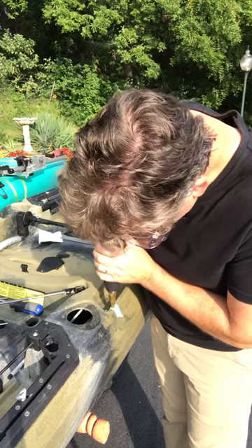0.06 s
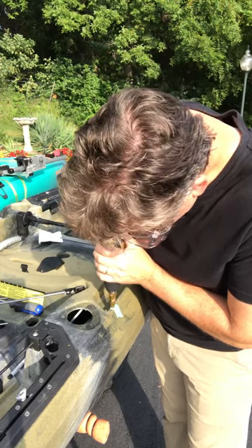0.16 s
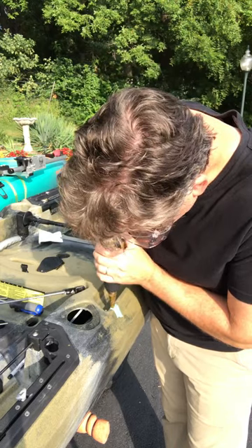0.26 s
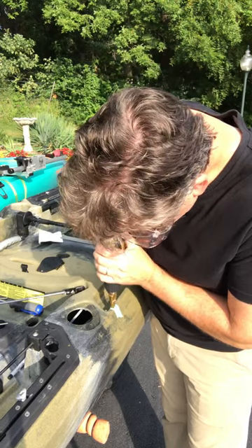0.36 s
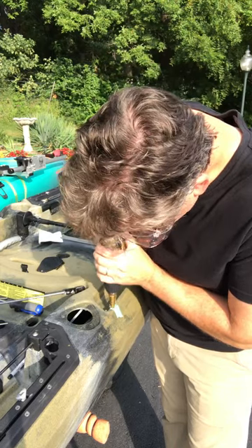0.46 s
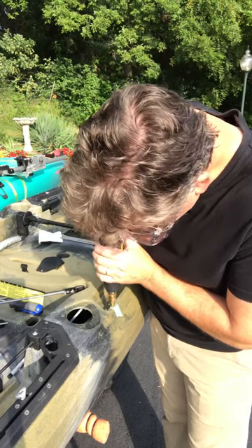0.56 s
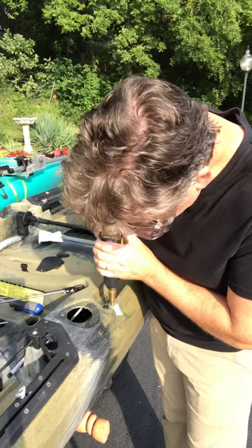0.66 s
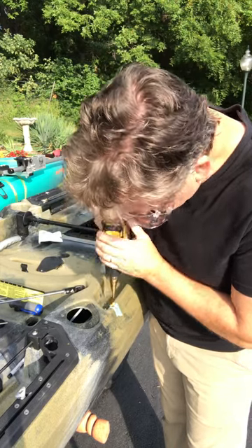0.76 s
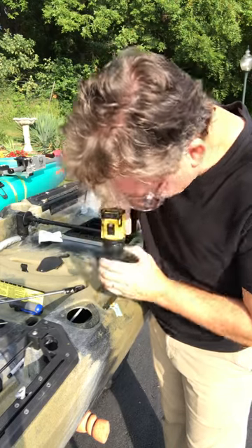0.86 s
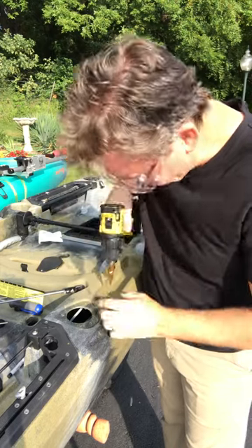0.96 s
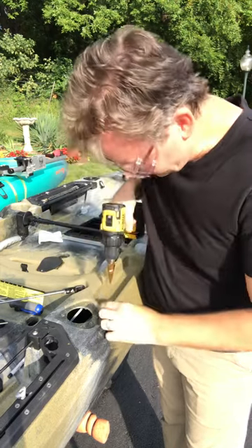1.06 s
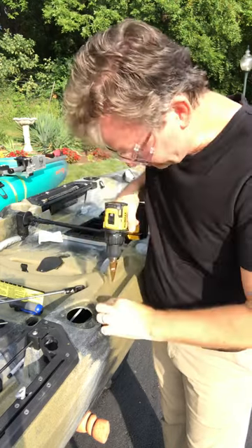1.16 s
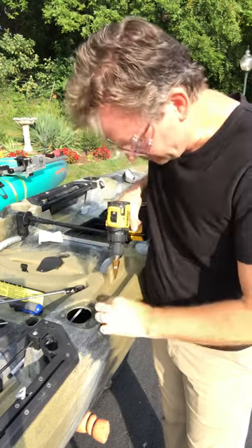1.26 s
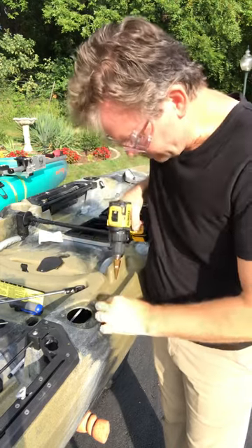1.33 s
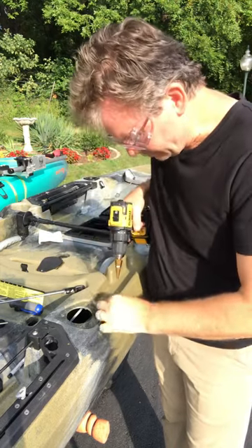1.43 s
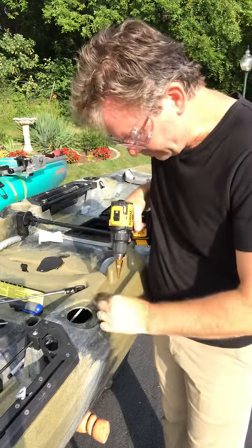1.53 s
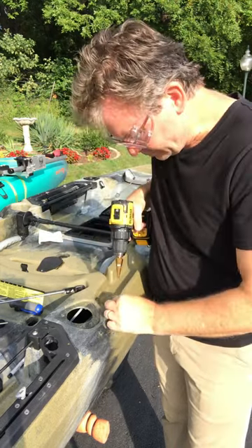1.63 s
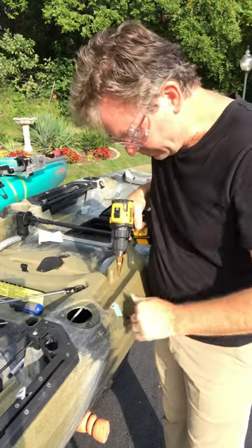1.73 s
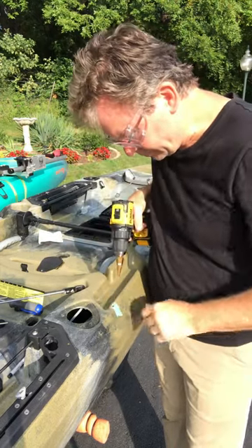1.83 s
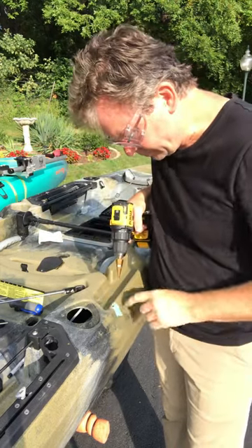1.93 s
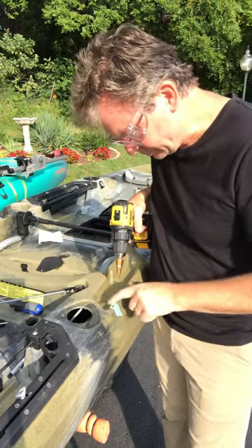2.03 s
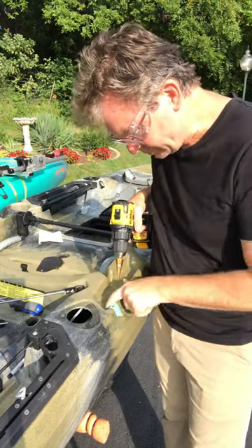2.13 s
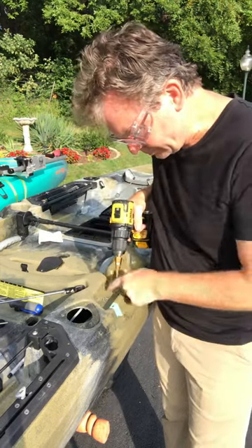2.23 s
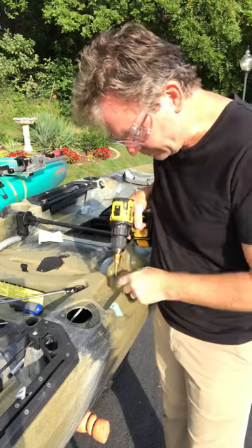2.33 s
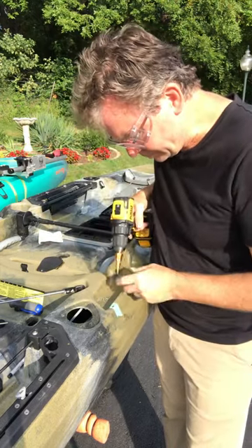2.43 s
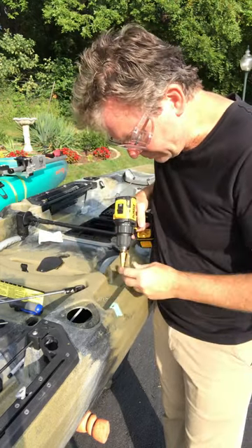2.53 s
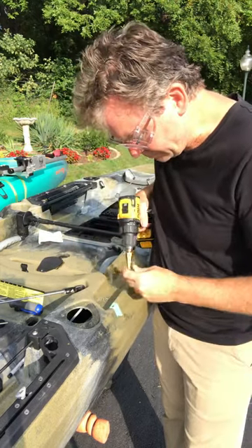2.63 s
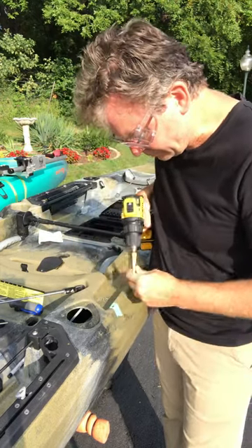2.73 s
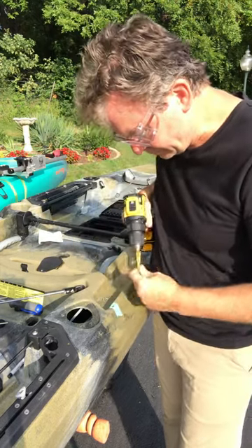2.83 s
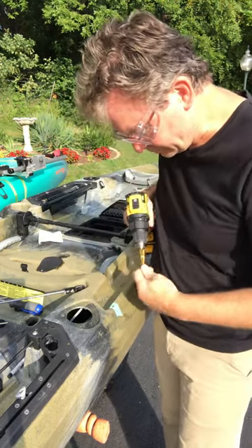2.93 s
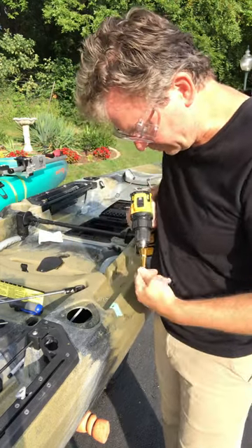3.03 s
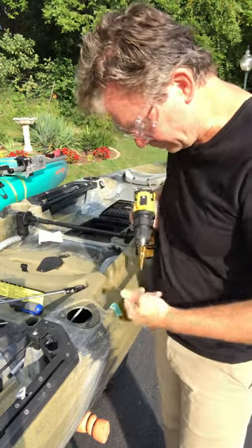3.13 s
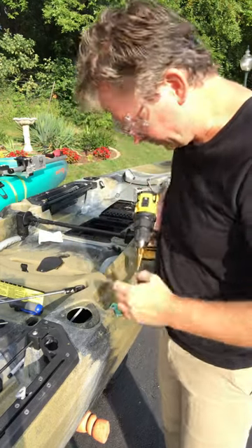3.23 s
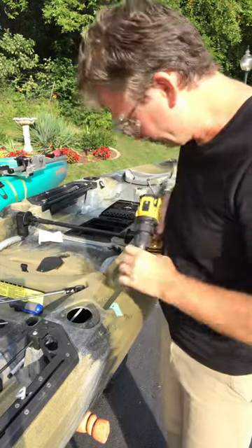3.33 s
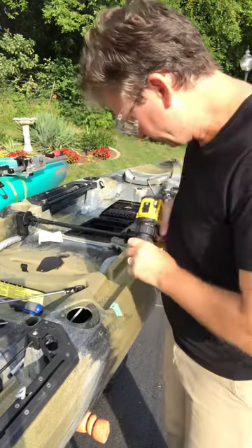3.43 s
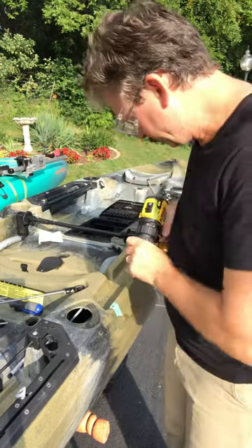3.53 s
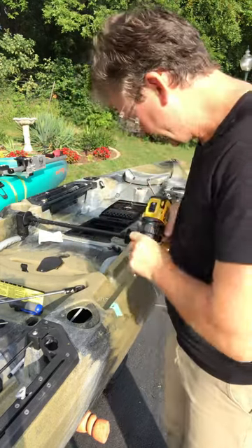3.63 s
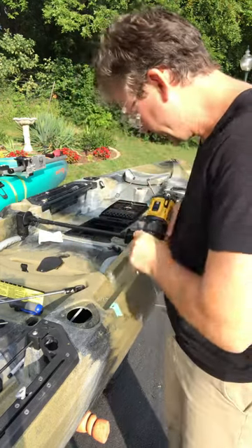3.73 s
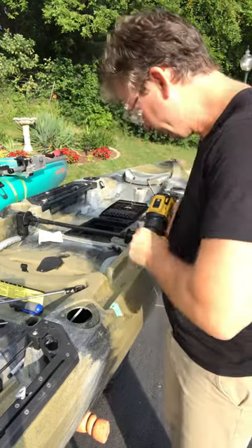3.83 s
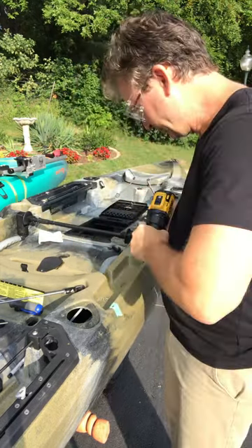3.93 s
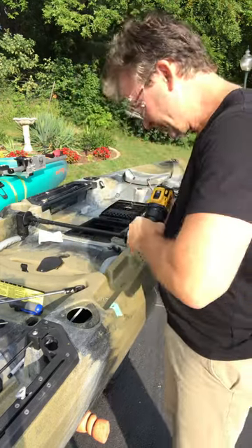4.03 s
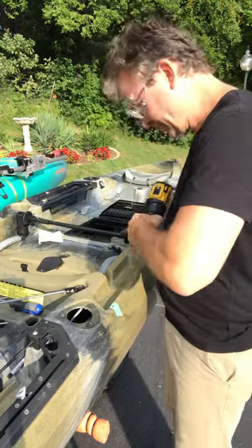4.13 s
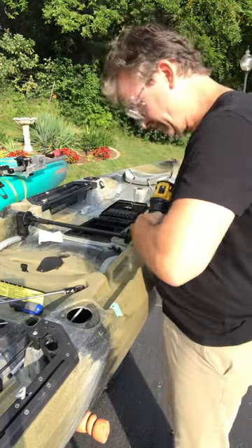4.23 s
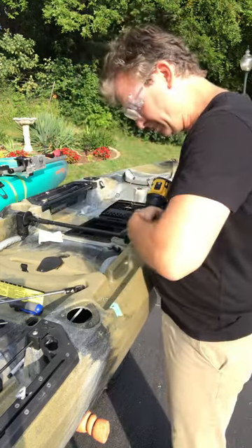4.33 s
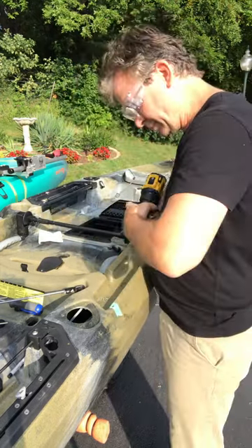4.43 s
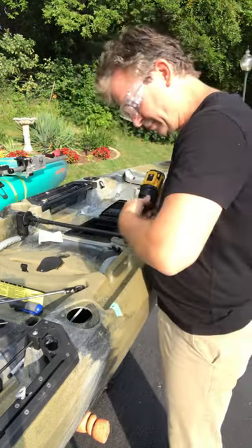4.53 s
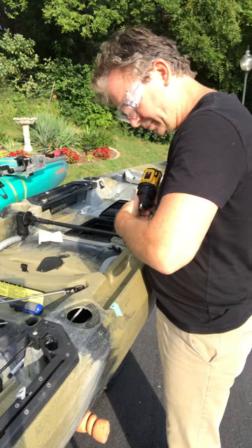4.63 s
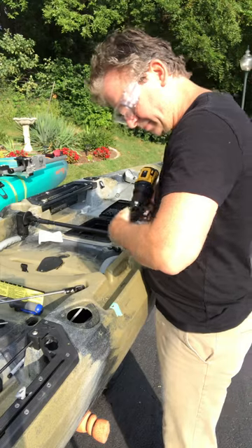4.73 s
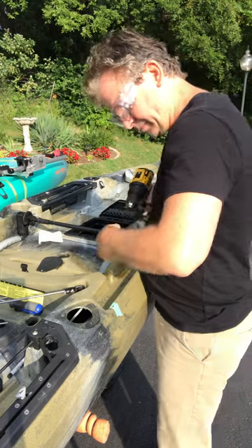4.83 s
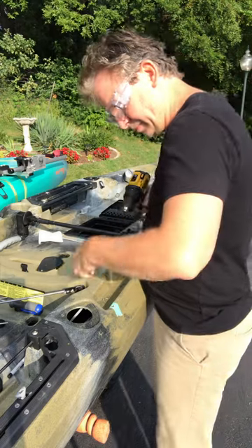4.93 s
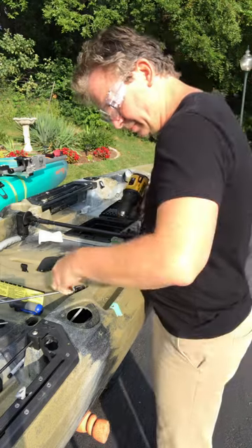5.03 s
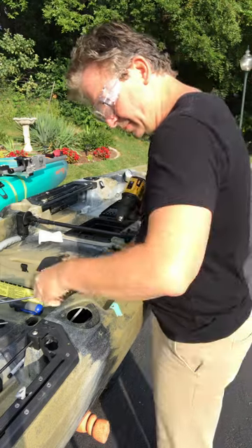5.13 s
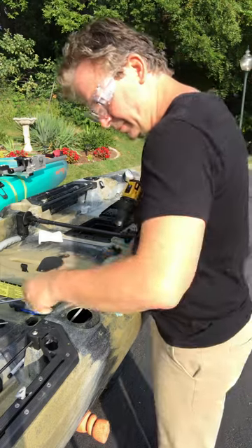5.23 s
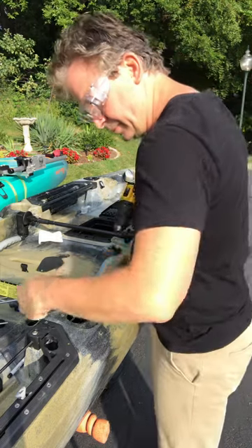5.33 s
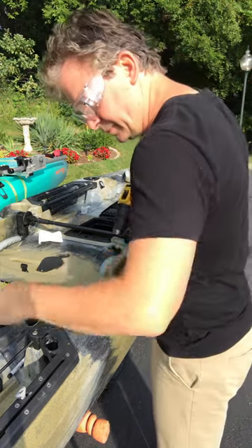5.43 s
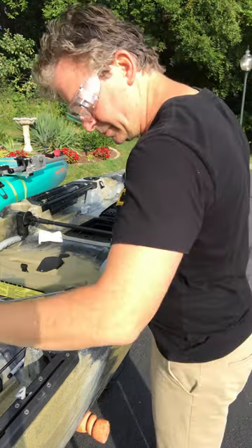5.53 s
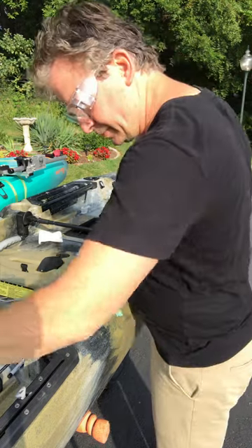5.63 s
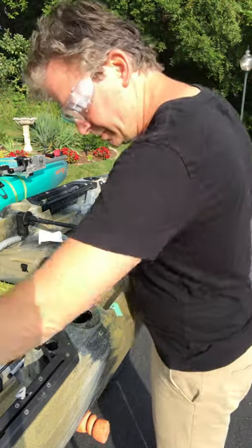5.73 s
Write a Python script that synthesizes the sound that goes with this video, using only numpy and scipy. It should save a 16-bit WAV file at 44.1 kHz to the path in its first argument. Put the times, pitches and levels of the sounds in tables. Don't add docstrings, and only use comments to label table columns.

```python
import sys
import numpy as np
from scipy import signal
from scipy.fft import rfft, irfft
from scipy.io import wavfile
from scipy.ndimage import uniform_filter1d, map_coordinates

SR = 44100
rng = np.random.default_rng(int(sys.argv[2]) if len(sys.argv) > 2 else 0)


def undo_db(level):
    steps = np.asarray(level, float) / 20
    return 10 ** steps


def transcribe(signal):
    frames = np.atleast_2d(signal).T
    limited = np.clip(frames, -1, 1)
    pcm = np.round(limited * 32767).astype(np.int16)
    wavfile.write(sys.argv[1], SR, pcm)


N = 254885


def unit(x):
    return x / np.sqrt(np.mean(x ** 2) + 1e-20)


def along(points, hz):
    f, v = np.transpose(points)
    return np.interp(np.log(hz + 1), np.log(f + 1), v)


def curves(rows):
    s, *cols = np.transpose(rows)
    return [np.interp(np.arange(N) / SR, s, c) for c in cols]


def gate(start, stop, attack, release):
    t = np.arange(N) / SR
    return np.clip(np.minimum((t - start) / attack, 1 + (stop - t) / release), 0, 1)


def bump(peak, width):
    return np.exp(-((np.arange(N) / SR - peak) / width) ** 2)


def wobble(rate):
    coarse = np.arange(0, N + 32, 32)
    knots = rng.standard_normal(int(N * rate / SR) + 4)
    return np.interp(np.arange(N), coarse, map_coordinates(knots, [coarse * rate / SR]))


def hiss(spectrum, patchy_db):
    hz, _, z = signal.stft(rng.standard_normal(N + SR), SR, nperseg=2048)
    field = uniform_filter1d(rng.standard_normal(z.shape), 20, 0)
    field = uniform_filter1d(field, 4, 1)
    gain = undo_db(along(spectrum, hz)[:, None] + patchy_db * unit(field))
    return unit(signal.istft(z * gain, SR, nperseg=2048)[1][:N])


def resonate(x, hz, breadth):
    q = hz / np.clip(breadth * hz, 5, .4 * SR)
    return signal.lfilter(*signal.iirpeak(hz, q, SR), x)


def line(turns, unsteady_db, slip):
    size = np.sqrt(2) * undo_db(unsteady_db * wobble(40.32))
    return size * np.sin(2 * np.pi * turns + slip * wobble(59.74))


def traffic():
    # f/Hz, level/dB per Hz
    road_spectrum = [(15, -38), (25, -31), (65, 2), (142, -8.5), (182, -13), (238, -11.5), (299, -15),
                     (642, -18.5), (1660, -24.5), (3500, -30), (4550, -83), (7700, -120)]
    return undo_db(-61.5 + 0.6 * wobble(3.9)) * hiss(road_spectrum, patchy_db=0.5)


def chorus():
    # f/Hz, level/dB per Hz
    chorus_spectrum = [(2600, -50), (3600, -19), (4340, -6), (4980, -11.5), (5670, -1.5), (6370, -4),
                       (7090, -1.5), (8100, -5), (8600, -13.5), (9500, -23.5), (10450, -28.5),
                       (11900, -19.5), (13500, -24.5), (15600, -33)]
    return undo_db(-58.5) * hiss(chorus_spectrum, patchy_db=1.36)


def far_cicada():
    # f/Hz, level/dB per Hz
    drone_spectrum = [(2500, -34), (3050, 5.5), (3500, 0), (3850, -5.5), (4400, -32)]
    # peak t/s, level/dB, half width/s
    swells = [
        (1.4, 10.5, .3),
        (2.0, 2, 0.27),
        (2.8, 8.5, 0.22),
    ]
    drone_db = -78.5 + sum(db * bump(s, width) for s, db, width in swells)
    return undo_db(drone_db) * hiss(drone_spectrum, patchy_db=1.2)


def katydid():
    # f/Hz, level/dB per Hz
    scrape_spectrum = [(12500, -40), (14300, -9), (15300, 3), (15700, 4), (17000, 0.5)]
    # base level/dB, swell/dB, peak t/s, half width/s
    base_db, swell_db, peak_s, width_s = (-91, 8, 4, 1.2)
    t = np.arange(N) / SR
    strokes_hz, slowing = 17.255, .1252
    strokes = .51 + strokes_hz * t - slowing * t ** 2 / 2
    song_db = base_db + swell_db * bump(peak_s, width_s) + 17.5
    return undo_db(song_db) * (.5 + .5 * np.cos(2 * np.pi * strokes)) ** 1.1 * hiss(scrape_spectrum, patchy_db=2.5)


def near_cicada():
    # f/Hz, level/dB per Hz
    rib_spectrum = [(5000, -49), (6400, -33), (6950, 2), (7300, -14), (8200, -27), (8800, -38)]
    # base level/dB, swell/dB, peak t/s, half width/s
    base_db, swell_db, peak_s, width_s = (-62.5, -10, -1.2, -2)
    t = np.arange(N) / SR
    pulses_hz, drift_pulses, drift_s = 53.775, .8, 3.85
    pulses = .4 + pulses_hz * t + drift_pulses * np.cos(2 * np.pi * (t - 3.5) / drift_s)
    song_db = base_db + swell_db * bump(peak_s, width_s) + 1.1 * wobble(2.3)
    return undo_db(song_db) * (.5 + .5 * np.cos(2 * np.pi * pulses)) ** 0.48 * hiss(rib_spectrum, patchy_db=0.5)


def cricket(bouts, hz, length):
    t = np.arange(N) / SR
    chirps = [(s, db) for first, end, gap, db in bouts for s in np.arange(first, end, gap)]
    shape = undo_db(wobble(3.9)) * sum(undo_db(db) * np.exp(-((t - s) / length) ** 4) for s, db in chirps)
    pulses = 1 + 0.54 * np.cos(2 * np.pi * 123 * t + wobble(8))
    rasp = resonate(resonate(rng.standard_normal(N), hz, breadth=0.028), hz, breadth=0.028)
    return shape * pulses * unit(rasp)


def crickets():
    # first t/s, end t/s, gap/s, level/dB
    low_bouts = [(.796, 1.9, .251, -76), (2.256, 2.9, .27, -77), (3.079, 5.7, .2306, -75.5)]
    high_bouts = [(1.209, 1.8, .252, -83), (2.03, 3.4, .252, -86), (3.505, 4.3, .231, -81),
                  (4.42, 5.7, .247, -83)]
    return cricket(low_bouts, hz=9100, length=0.039) + cricket(high_bouts, hz=10040, length=0.032)


def jay():
    # t/s, length/s, level/dB, fall of pitch/Hz
    notes = [
        (1.225, .17, -62, 26),
        (1.478, .16, -62, 16),
        (1.675, .075, -69, 4),
        (1.8, .07, -74, 4),
    ]
    start_hz, echo_hz, flutter_hz = 792, 776, 13
    opens_db, echo_dull_db = 14, -9
    out, t = np.zeros(N), np.arange(N) / SR
    for k, (s, length, db, sag_hz) in enumerate(notes):
        done, echo = np.clip((t - s) / length, 0, 1), k > 1
        pitch = (echo_hz if echo else start_hz) - sag_hz * done ** 1.5 + 2.5 * wobble(25)
        turns = np.cumsum(pitch) / SR
        second = undo_db(db + opens_db * (np.sqrt(done) - 1) + 0.74 + echo * echo_dull_db)
        fourth = undo_db(db - 2.5) * (1 + .55 * np.cos(2 * np.pi * flutter_hz * (t - s - .015)))
        voice = second * line(2 * turns, unsteady_db=1.8, slip=.25)
        voice += second * undo_db(-19) * line(3 * turns, unsteady_db=2.5, slip=.4)
        voice += fourth * line(4 * turns, unsteady_db=1.8, slip=.5)
        voice += fourth * undo_db(-12) * line(6 * turns, unsteady_db=2.5, slip=.5)
        out += gate(s, s + length, attack=0.012, release=0.016) * voice
    return out


def far_whistles():
    # t/s, length/s, f/Hz, level/dB
    whistles = [(3.505, .06, 3155, -73), (3.585, .04, 3150, -79), (5.56, .15, 3215, -78)]
    out, t = np.zeros(N), np.arange(N) / SR
    for s, length, hz, db in whistles:
        out += gate(s, s + length, .03, .03) * undo_db(db) * line(hz * t, unsteady_db=1.6, slip=.25)
    return out


def chip():
    # t/s, length/s, from f/Hz, to f/Hz, level/dB
    sweeps = [(3.709, .013, 5700, 6700, -47), (3.721, .009, 7000, 7600, -53),
              (3.733, .008, 6100, 7300, -54)]
    out, t = np.zeros(N), np.arange(N) / SR
    buzz = 1 + .6 * np.cos(2 * np.pi * 500 * t)
    for s, length, low, high, db in sweeps:
        turns = np.cumsum(low + (high - low) * np.clip((t - s) / length, 0, 1)) / SR
        tone = np.sin(2 * np.pi * turns) + 0.065 * np.sin(4 * np.pi * turns)
        out += gate(s, s + length, .003, .004) * buzz * undo_db(db) * tone
    return out


def yard(x):
    # f/Hz, t60/s
    decay = [(200, 0.43), (2000, 0.087), (10000, 0.59)]
    hz, t, z = signal.stft(rng.standard_normal(SR // 2), SR, nperseg=256)
    tail = signal.istft(z * undo_db(-60 * t / along(decay, hz)[:, None]), SR, nperseg=256)[1]
    return signal.fftconvolve(np.pad(x, (300, 0)), tail / np.linalg.norm(tail))[:N]


def shell(x, modes):
    return sum(undo_db(db) * resonate(x, hz, width / hz) for hz, width, db in modes)


def hull(x):
    # f/Hz, width/Hz, level/dB
    skin_modes = [(193, 58, -0.5), (350.4, 37, -1.5), (518, 40, -11), (706, 46, -10), (928, 64, -3.5),
                  (1150, 74, -13), (1380, 110, -10)]
    return shell(x, skin_modes)


def fingers():
    # t/s, level/dB, centre f/Hz, length/s, breadth
    scuffs = [(0.783, -62, 690, 0.076, 1.8), (0.845, -59.5, 1240, 0.032, 0.69),
              (1.171, -67.5, 596, 0.055, 2.3), (1.521, -56.5, 1480, 0.052, 3.2),
              (1.551, -58, 466, 0.058, 1), (1.632, -57, 1360, 0.056, 1.7), (2.164, -72, 12000, 0.13, .8),
              (2.106, -58.5, 1200, 0.047, 4), (2.169, -60, 2000, 0.069, 1.7), (2.8, -61.5, 900, .1, 2.7),
              (3.414, -66.5, 1230, 0.11, 1.1), (3.482, -62.5, 1240, 0.064, 1),
              (3.891, -58, 1200, 0.031, 1.7), (4.345, -60, 1490, 0.045, 1.5),
              (4.511, -59.5, 2240, 0.079, 2.9), (4.615, -55, 1660, 0.046, 1),
              (4.619, -54, 4000, 0.044, 0.26), (4.617, -58.5, 10000, 0.038, 1.2),
              (4.855, -57, 1350, 0.087, 1.4), (4.967, -49.5, 2000, 0.034, 1.8)]
    out, t = np.zeros(N), np.arange(N) / SR
    for s, db, hz, length, breadth in scuffs:
        part = slice(round((s - 1.5 * length) * SR), round((s + 1.5 * length) * SR))
        clumps = undo_db(4.1 * np.repeat(rng.standard_normal(SR // 2 // 50), 50))
        grains = rng.standard_normal(SR // 2) * clumps
        stroke = np.exp(-8 * ((t[part] - s) / length) ** 2)
        band = resonate(resonate(grains, hz, breadth), hz, breadth)
        out[part] += undo_db(db) * stroke * unit(band)[:len(stroke)]
    return out


def blows(rows, body, breadth, grit, grit_per_s):
    out, t = np.zeros(N + SR), np.arange(SR // 4) / SR
    for s, db, hz, t60 in rows:
        noise = rng.standard_normal(len(t))
        push = (grit + grit_per_s * t60) * noise * undo_db(-60 * t / t60)
        push[0] = -1
        ring = body(resonate(resonate(push, hz, breadth), hz, 2 * breadth))
        out[round(s * SR):][:len(t)] += undo_db(db) * ring / np.max(np.abs(ring))
    return out[:N]


def clicks():
    # t/s, peak level/dB, centre f/Hz, grit t60/s
    ticks = [(.97, -46.5, 1940, .018), (1.654, -44, 2800, 0.0072), (3.433, -51, 3000, 0.02),
             (3.757, -52, 1300, .014), (3.855, -48, 1490, 0.019), (3.88, -32.5, 1080, 0.0055),
             (3.897, -56, 1400, 0.0091), (4.396, -49, 1630, 0.033), (4.484, -50, 3200, 0.015),
             (4.822, -36, 2880, 0.005), (4.862, -43, 4000, .006), (4.868, -47, 3500, .006),
             (4.875, -38.5, 2120, 0.018), (4.882, -39, 2470, .008), (4.921, -40, 2800, 0.0067),
             (4.955, -30, 2880, .006), (4.968, -54, 2900, .011), (4.979, -41, 2500, 0.016)]
    # t/s, peak level/dB, centre f/Hz, grit t60/s
    snaps = [(.632, -43, 11000, 0.0035), (.918, -42, 800, 0.023), (.7165, -20.5, 3000, 0.003),
             (.7172, -22.5, 125, 0.0039), (2.094, -55, 1200, .016), (2.811, -45, 4000, .008),
             (3.665, -42.5, 1200, 0.011), (3.862, -43, 2200, 0.02), (3.879, -39.5, 3560, 0.018),
             (4.417, -45.5, 1980, 0.026)]
    narrow = blows(ticks, lambda x: x, breadth=0.81, grit=0.069, grit_per_s=19.0)
    return narrow + blows(snaps, lambda x: x, breadth=2.05, grit=.03, grit_per_s=34.0)


def knocks():
    # t/s, peak level/dB, contact f/Hz, grit t60/s
    bumps = [(.565, -34, 347, .07), (.593, -27, 207, .04), (.674, -31.5, 726, 0.12),
             (.692, -24, 890, 0.018), (.701, -23.5, 670, 0.028), (.717, -31, 294, 0.01),
             (.745, -59, 396, .06), (.975, -42, 219, 0.16), (1.657, -42.5, 306, 0.018),
             (1.662, -45.5, 198, 0.088), (1.547, -52, 200, 0.087), (2.099, -36, 368, 0.0098),
             (2.104, -37.5, 241, 0.17), (3.881, -43, 520, 0.025), (4.845, -50.5, 336, 0.23),
             (4.875, -44, 600, .033), (4.955, -47, 226, 0.081)]

    def struck(x):
        return resonate(0.29 * x + hull(x), hz=460, breadth=1.9)
    return blows(bumps, struck, breadth=0.97, grit=0.11, grit_per_s=0.37)


def trigger():
    # t/s, peak level/dB, centre f/Hz, grit t60/s
    contacts = [
        (.912, -50, 6000, 0.03),
        (.9168, -28, 2710, 0.033),
        (.921, -32, 4940, 0.018),
    ]
    # f/Hz, width/Hz, level/dB
    housing_modes = [(1350, 760, 6), (1880, 130, 1), (2900, 380, -6), (3720, 300, 3), (4830, 610, -5),
                     (6860, 500, -15), (8600, 520, -2)]
    return blows(contacts, lambda x: 0.14 * x + shell(x, housing_modes), breadth=1.8, grit=0.23, grit_per_s=5.0)


def hull_hum(turns):
    t = np.arange(N) / SR
    null_s, beat_s = .267, .215
    beat = np.sin(np.pi * (t - null_s) / beat_s) * gate(0, .615, 0.056, 0.057)
    return undo_db(-56.5 + 25.5 * np.minimum(t, 1)) * beat * line(turns, unsteady_db=2.5, slip=0.46)


def gear_whine(turns):
    # multiple of shaft speed, level/dB
    mesh_orders = [(15, -11), (20, -11.5), (25, -16), (11, -16), (9, -14)]
    t = np.arange(N) / SR
    bites_s, catch_s, through_s = .08, .335, .53
    cutting = gate(bites_s, through_s, .02, .02) * (1 - bump(catch_s, .016) ** .5) * undo_db(1.5 * wobble(120))
    idle = undo_db(-56) * gate(-1, .615, 1, 0.034)
    whine = idle + undo_db(-47 + 9 * np.minimum(t, 1)) * cutting
    overtones = sum(undo_db(db) * line(k * turns, unsteady_db=3, slip=1.6) for k, db in mesh_orders)
    return whine * (line(10 * turns, unsteady_db=1.8, slip=.35) + overtones)


def unbalance(turns):
    return 1 + 0.039 * np.cos(2 * np.pi * turns)


def cut(turns):
    # multiple of shaft speed, level/dB
    cut_orders = [(2, -13), (3, -8.5), (4, -9.5), (5, -7.5), (7, -13)]
    # f/Hz, level/dB per Hz
    chatter_spectrum = [(94, -33), (160, -11), (198, -10.5), (260, -15.5), (379, -3), (818, -4), (948, 0),
                        (1200, -7.5), (1350, -6), (2400, -9.5), (3120, -9), (5280, -120)]
    orders = sum(undo_db(db) * line(k * turns, unsteady_db=2.5, slip=.7) for k, db in cut_orders)
    chips = undo_db(2.4 * wobble(250))
    chatter = unit(unbalance(turns) * chips * hiss(chatter_spectrum, patchy_db=1.4))
    return undo_db(-2.5) * orders + undo_db(-1.5) * chatter + undo_db(-8.5) * unit(hull(chatter))


def motor_fan(turns):
    # f/Hz, level/dB per Hz
    fan_spectrum = [(940, -12.5), (1600, -20), (1870, -2), (2610, -20.5), (2820, -6.5), (3790, -5),
                    (4420, -7), (9240, -21), (10400, -30), (12400, -25), (15800, -40)]
    return unbalance(turns) * hiss(fan_spectrum, patchy_db=0.5)


def drill():
    # t/s, shaft f/Hz
    shaft_speed = [(0, 180), (.075, 185), (.11, 203), (.18, 199.5), (.322, 197), (.338, 190.5),
                   (.47, 185.5), (.54, 189), (.59, 197)]
    # t/s, cutting level/dB
    bit_load = [(0, -48), (.09, -39.5), (.17, -40), (.39, -40.5), (.435, -37.5), (.48, -42), (.516, -38.5),
                (.6, -39.5), (.67, -51)]
    t, (cut_db,) = np.arange(N) / SR, curves(bit_load)
    cut_ends_s = bit_load[-1][0]
    fan_db = max(cut_db) - 5 + 0.92 * (cut_db - max(cut_db))
    catching = 1 + .0035 * wobble(45)
    turns = np.cumsum(curves(shaft_speed)[0] * catching) / SR
    chuck = undo_db(1.06 * np.cos(2 * np.pi * turns / 7.8) + 1.3 * wobble(30.9))
    working = hull_hum(turns) + gear_whine(turns) + chuck * undo_db(cut_db) * cut(turns)
    coasting = undo_db(-42 * np.clip(t - cut_ends_s, 0, None))
    fan = coasting * chuck * undo_db(fan_db) * motor_fan(turns)
    return gate(-1.7, cut_ends_s, 1, 0.1) * working + fan


def scene():
    background = traffic() + chorus() + far_cicada() + katydid() + near_cicada() + crickets()
    far = jay() + far_whistles() + chip()
    near = fingers() + clicks() + knocks() + trigger() + drill()
    mono = background + far + near + yard(undo_db(-11.5) * near + undo_db(-6.5) * far)
    return np.array([mono, mono])


def low_pass(x):
    return signal.sosfilt(signal.butter(12, 16410, fs=SR, output="sos"), x)


def record(dry):
    in_band = np.fft.rfftfreq(N, 1 / SR) < 15800
    return low_pass(irfft(rfft(dry) * in_band, N))


dry = scene()
out = record(dry)
transcribe(out)
```